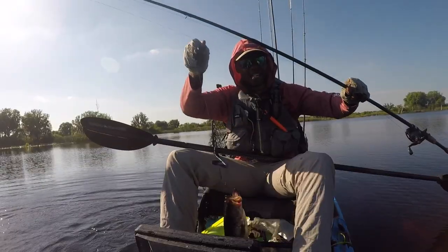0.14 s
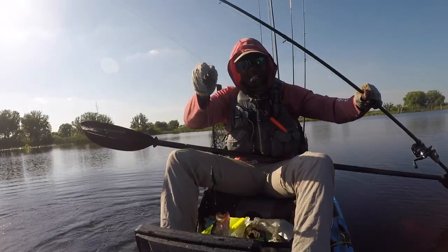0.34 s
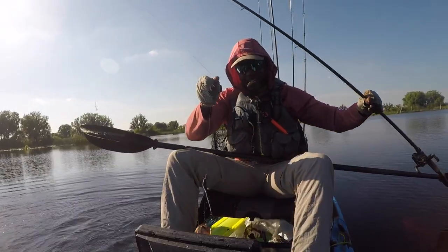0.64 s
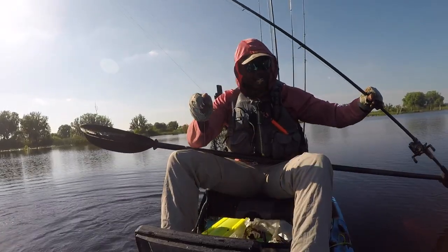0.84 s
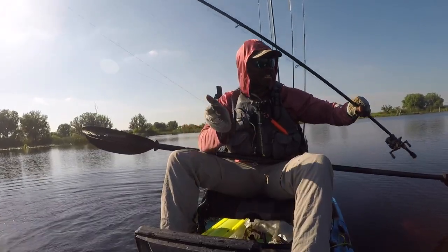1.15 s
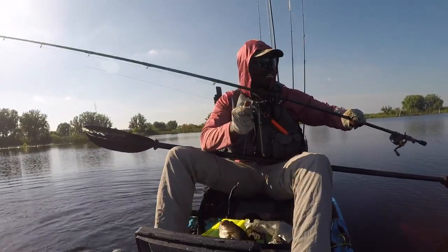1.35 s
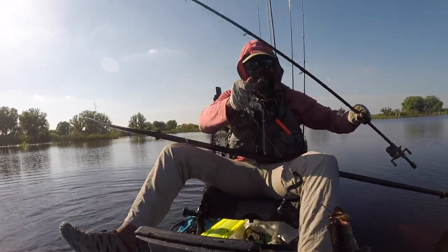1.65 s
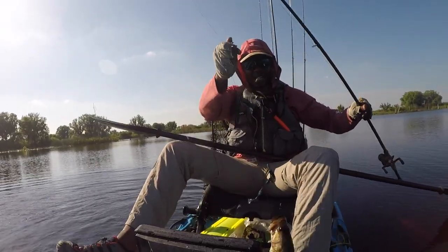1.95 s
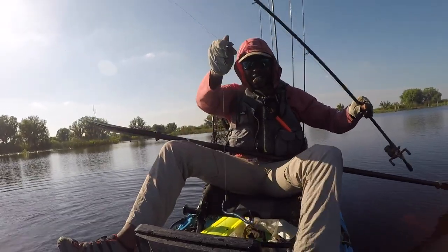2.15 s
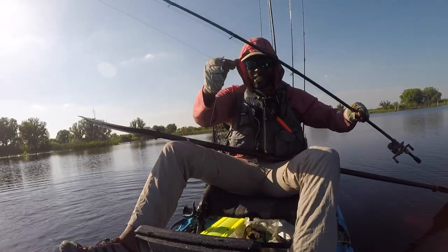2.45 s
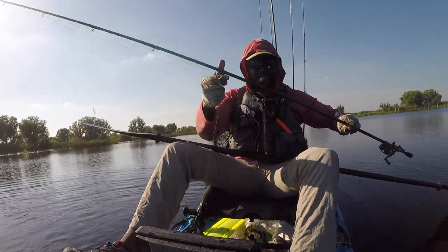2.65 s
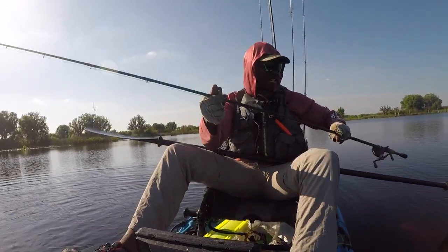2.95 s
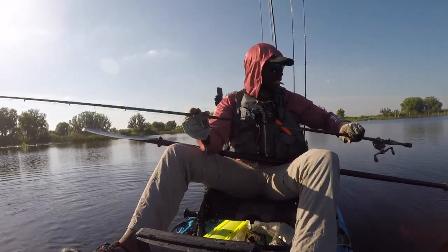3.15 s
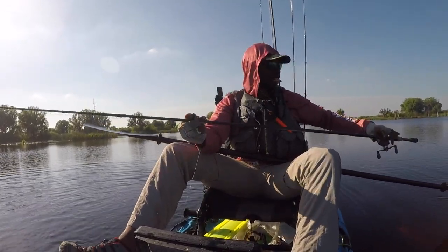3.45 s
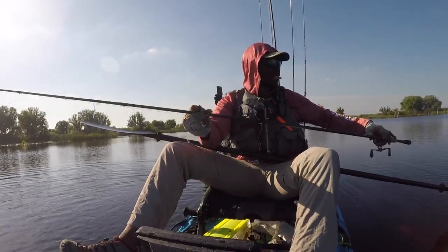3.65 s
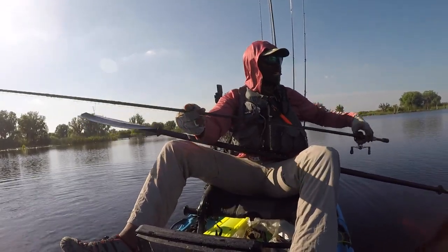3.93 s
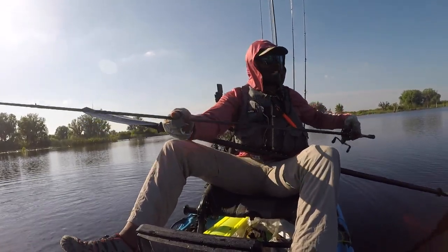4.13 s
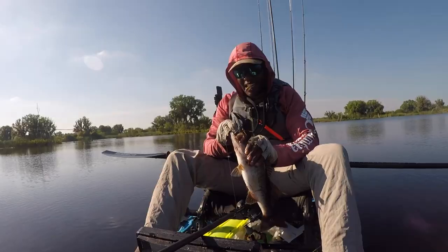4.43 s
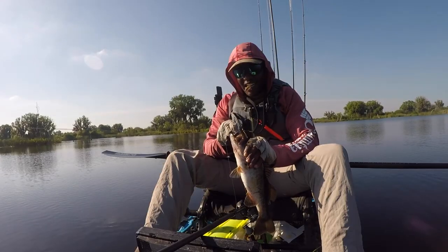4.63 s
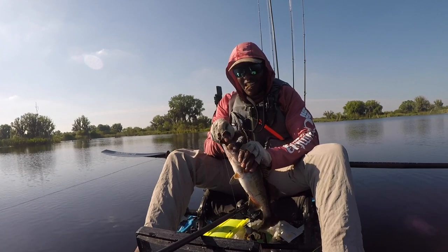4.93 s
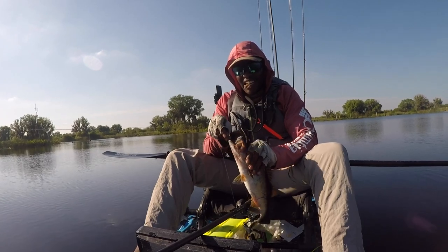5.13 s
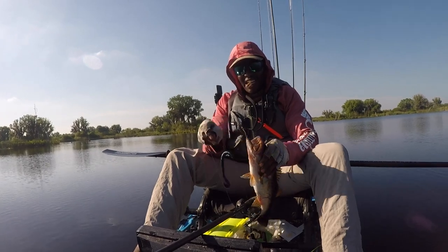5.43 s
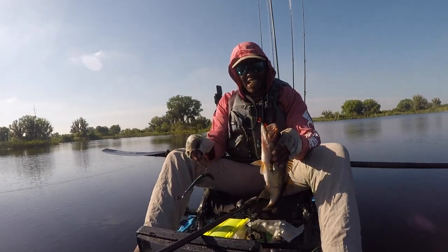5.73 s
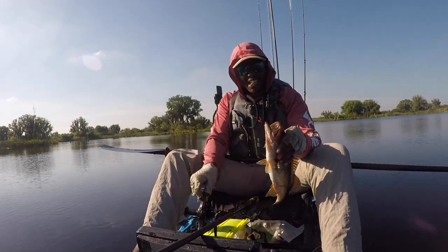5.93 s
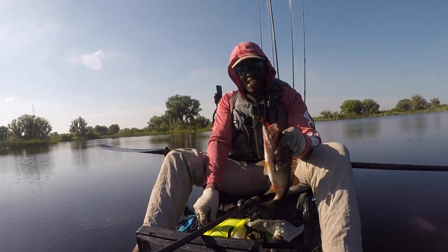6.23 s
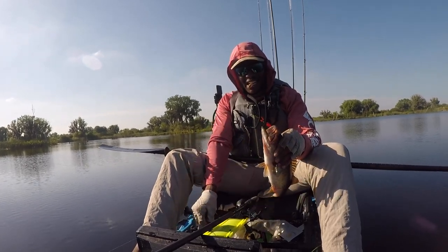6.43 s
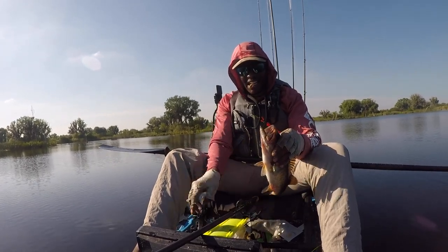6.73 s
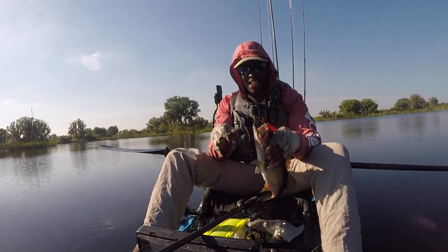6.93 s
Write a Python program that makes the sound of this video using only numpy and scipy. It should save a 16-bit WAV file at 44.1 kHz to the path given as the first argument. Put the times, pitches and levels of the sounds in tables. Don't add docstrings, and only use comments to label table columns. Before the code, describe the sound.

On a calm lake, a camera clamped to a plastic kayak picks up a few soft bumps, then a fish thrashing violently: deep hollow hull booms, cracking wet slaps, spray and rattling deck gear. A buzzing bird calls briefly behind it. The uproar cuts off abruptly, leaving soft airy hush, small tackle clicks, faint lapping and a light rustle.

```python
import sys
import numpy as np
from scipy import signal
from scipy.fft import rfft, irfft, next_fast_len
from scipy.io import wavfile
from scipy.ndimage import uniform_filter1d, map_coordinates

SR = 44100
rng = np.random.default_rng(int(sys.argv[2]) if len(sys.argv) > 2 else 0)


def gain_from_decibels(decibels):
    exponent = np.asarray(decibels, float) / 20
    return 10 ** exponent


def pcm_store(signal):
    levels = np.round(np.clip(np.atleast_2d(signal), -1, 1) * 32767)
    wavfile.write(sys.argv[1], SR, levels.astype(np.int16).T)


N = 312228
TIME_S = np.arange(N) / SR
STEP = 32
CUT_S = 4.393

# (frequency [Hz], width [Hz], level [dB])
MOUNT_MODES = [(35.6, 21, -4), (65.3, 37.7, -7.5)]
# (frequency [Hz], width [Hz], level [dB])
HULL_MODES = [(91, 30, -3.5), (126, 27, 0.5), (165, 37, -5), (201, 53, -5), (266, 37, -6.5)]
# (frequency [Hz], width [Hz], level [dB])
DECK_MODES = [(302.6, 52.3, 2), (380.2, 45, 1), (466, 81, -6.5), (593.5, 81, -7), (730, 118, -11.5),
              (885, 120, -20.5)]
# (time [s], peak [dB], body [dB])
FLANK_KNOCKS = [(1.0444, -30.5, -13), (1.175, -46.5, 7.5), (1.328, -32.5, 18.5), (1.358, -34, 1),
                (1.492, -34, -2), (1.604, -38.5, 7), (1.734, -34.5, -8), (1.836, -31.5, 10.5),
                (2.036, -50, 5), (2.101, -38.5, -21), (2.157, -46.5, 11), (2.1695, -24.5, -11.5),
                (2.24, -37, -8), (2.408, -42, 12), (2.541, -42, 10), (2.852, -40, 5), (3.099, -36, 2),
                (3.454, -25, 1), (3.479, -26.5, -7), (3.662, -23, 0.5), (2.906, -40, 7), (3.157, -40.5, -4),
                (3.198, -34.5, -5), (3.65, -32, -2), (3.844, -38, -6), (3.927, -30, 12), (3.998, -46, -1),
                (4.045, -40, -5), (4.168, -32, 7.5), (4.179, -42, 14), (4.326, -40, 14.5)]


def unit(x):
    return x / np.sqrt(np.mean(x ** 2) + 1e-20)


def along(points, hz):
    f, v = np.transpose(points)
    return np.interp(np.log(hz + 1), np.log(f + 1), v)


def curves(rows):
    s, *cols = np.transpose(rows)
    return [np.interp(TIME_S, s, c, left=-120, right=-120) for c in cols]


def wobble(rate):
    knots = rng.standard_normal(int(N * rate / SR) + 4)
    return map_coordinates(knots, [np.arange(N) * rate / SR])


def filtered(x, *responses):
    m = next_fast_len(N + SR // 4, True)
    hz, spectrum = np.fft.rfftfreq(m, 1 / SR), rfft(x, m)
    for response in responses:
        spectrum = spectrum * response(hz)
    return irfft(spectrum, m)[..., :N]


def modes(table):
    def response(f):
        total = 0
        for k, (hz, width, db) in enumerate(table):
            band = 1j * f * width
            total = total + (-1) ** k * gain_from_decibels(db) * band / (hz * hz - f * f + band)
        return total
    return response


def grit(rate, spread_db, hiss):
    size = np.minimum(rng.exponential(size=N), 3)
    taps = (rng.random(N) < rate / SR) * rng.standard_normal(N) * gain_from_decibels(spread_db * size)
    return unit(taps) + hiss * rng.standard_normal(N)


def even(x, span_s):
    return x / np.sqrt(np.abs(uniform_filter1d(x * x, int(span_s * SR))) + 1e-12)


def swells(s, db, rise_s, t60):
    late = np.arange(0, N, STEP) / SR - np.asarray(s)[:, None]
    span = np.where(late < 0, np.abs(rise_s)[..., None], np.abs(t60)[..., None]) + 1e-3
    return gain_from_decibels(np.asarray(db)[:, None] - 60 * np.abs(late) / span) ** 2


def smooth(control):
    return np.interp(np.arange(N), np.arange(0, N, STEP), control)


def loudness(energy, idle_db):
    return smooth(np.sqrt(energy.sum(axis=0) + gain_from_decibels(idle_db) ** 2))


def before_cut():
    return np.clip((CUT_S - TIME_S) / .006, 0, 1)


def shake(shell, hiss):
    boom = filtered(grit(70, spread_db=2, hiss=hiss), modes(shell), modes([(165, 177, 0)]))
    rattle = filtered(grit(300, spread_db=5, hiss=hiss), modes(DECK_MODES), modes([(396, 700, 0)]))
    return even(boom, 0.053), even(rattle, 0.03)


def hull():
    # (time [s], boom [dB], panel pitch [Hz], t60 [s])
    strikes = [
        (1.494, -28, 165, 0.38),
        (2.409, -31.5, 213.8, 0.42),
        (2.549, -14.5, 165, 0.495),
        (2.852, -26.5, 189.4, 1.7),
        (2.933, -20.5, 176.5, 0.72),
        (3.365, -20, 152.5, 0.63),
        (4.075, -18, 203.6, 0.46),
    ]
    # (time [s], boom [dB], panel pitch [Hz], t60 [s])
    heaves = [(.036, -34.5, 223, 0.57), (0.174, -36, 196.7, 0.25), (0.357, -37.5, 201.5, 0.49),
              (0.751, -39, 218.6, 0.29), (1.2, -32.5, 215.1, 0.52), (1.295, -16.5, 229.8, 0.63),
              (1.385, -21.5, 197.8, 0.27), (1.53, -20.5, 163.3, 1.04), (1.629, -24, 180, 0.97),
              (1.71, -24.5, 180, 0.51), (1.778, -22, 220.1, 0.87), (1.827, -18.5, 185, 0.33),
              (1.92, -27, 171.6, 1), (1.988, -20, 148.4, 0.54), (2.04, -16, 217.2, 0.29),
              (2.178, -24.5, 128.2, 0.66), (2.6, -16, 135.2, .3), (2.642, -13, 128, .07),
              (2.68, -31, 132, 1.46), (3.018, -19, 185.5, 0.5), (3.116, -18.5, 130.6, 0.59),
              (3.41, -14, 186, 0.84), (3.482, -18.5, 156, 1.1), (3.58, -20.5, 134.7, 0.46),
              (3.672, -20, 113.7, 0.54), (3.902, -36, 190.6, 1.43), (4.178, -31, 140, 0.4),
              (4.355, -29, 126, 0.49)]
    # (time [s], level [dB], rise [s], t60 [s])
    rattles = [(0.035, -44, 0.21, 0.29), (.175, -53, 0.19, .1), (.358, -40.5, .15, 0.15),
               (.751, -43.5, .15, 0.1), (1.125, -40, 0.078, .5), (1.18, -32.5, .03, 0.63),
               (1.288, -15.5, 0.1, 0.19), (1.335, -20.5, 0.092, 0.23), (1.361, -27.5, 0.037, 0.1),
               (1.495, -21.5, 0.028, 0.11), (1.532, -26, 0.045, 0.32), (1.607, -34.5, .04, 0.22),
               (1.63, -25, 0.056, 0.23), (1.708, -28, 0.076, 0.27), (1.781, -29, 0.058, 0.32),
               (1.81, -24, 0.07, 0.21), (1.842, -29.5, 0.064, 0.077), (1.95, -31, 0.79, .5),
               (1.995, -26.5, .2, 0.24), (2.04, -25.5, 0.046, .12), (2.07, -40, .1, 0.36),
               (2.174, -39, 0.14, 0.43), (2.411, -33.5, 0.013, 0.1), (2.546, -26, 0.011, 0.21),
               (2.866, -34, 0.071, .4), (2.942, -21, 0.016, 0.25), (3.02, -28.5, 0.05, 0.14),
               (3.111, -25, .04, .3), (3.2, -38.5, 0.043, 0.19), (3.376, -17.5, 0.056, 0.079),
               (3.42, -19.5, .12, 0.24), (3.478, -19, 0.087, 0.2), (3.545, -22, .04, 0.11),
               (3.672, -26.5, .08, 0.16), (3.85, -45.5, .03, 0.56), (3.93, -33, 0.055, 0.24),
               (4.078, -23, 0.046, .15), (4.177, -35, .03, 0.2), (4.33, -34.5, .02, .2),
               (4.35, -28.5, 0.074, 0.13)]
    # (time [s], level [dB], t60 [s])
    jolts = [(1.35, -49.5, 2.7), (1.6, -26, 0.2), (1.81, -26.5, 0.41), (2.09, -28, 0.22),
             (2.211, -30.5, 0.41), (2.4, -45.5, 2.4), (2.58, -36, 1.5), (2.95, -30, 2.5),
             (3.15, -22.5, 1.27), (3.51, -24, 0.48), (3.68, -21, 0.57), (3.95, -40, 2.3), (4.11, -30, 2.5),
             (4.35, -29, 0.8)]
    strike_rise_s, heave_rise_s, jolt_rise_s = .012, .3, 0.44
    slack, slacken_s = 0.66, .12
    idle_boom_db, idle_rattle_db, idle_sway_db = -45.5, -62.5, -63
    full_hum_s = 1.4
    panel_s = 1.26

    s, boom_db, hz, t60 = np.transpose(strikes + heaves)
    rise_s = np.repeat([strike_rise_s, heave_rise_s], [len(strikes), len(heaves)])
    energy = swells(s, boom_db, rise_s, t60)
    since_s = np.maximum(np.arange(0, N, STEP) / SR - s[:, None], 0)
    pitch = hz[:, None] * (slack + (1 - slack) * np.exp(-since_s / slacken_s))
    panel_hz = smooth((energy * pitch).sum(axis=0) / (energy.sum(axis=0) + 1e-30))

    boom_gain = loudness(energy, idle_boom_db)
    rattle_gain = loudness(swells(*np.transpose(rattles)), idle_rattle_db)
    s, db, t60 = np.transpose(jolts)
    sway_gain = loudness(swells(s, db, jolt_rise_s, t60), idle_sway_db)

    jolting = grit(40, spread_db=9.5, hiss=0.36)
    sway = even(filtered(jolting, modes(MOUNT_MODES), modes([(45.6, 155, 0)])), 0.06)
    phase = 2 * np.pi * np.cumsum(panel_hz) / SR + 1.48 * wobble(35)
    panel = unit(np.sin(phase) * gain_from_decibels(2.3 * wobble(35)))
    boom, rattle = shake(HULL_MODES, hiss=1.58)
    share = np.where(TIME_S < panel_s, .3, .7)
    hum = np.sqrt(share) * panel + np.sqrt(1 - share) * boom
    thin_hum = filtered(hum, lambda hz: 1 / (1 + (132 / (hz + 1)) ** 8))
    hum = np.where(TIME_S < full_hum_s, thin_hum, hum)
    return before_cut() * (gain_from_decibels(2.0) * sway_gain * sway + gain_from_decibels(-2.5) * boom_gain * hum + rattle_gain * rattle)


def blows():
    # (time [s], peak [dB], panel pitch [Hz])
    hull_hits = [(1.114, -23, 201), (1.284, -7, 272), (1.317, -0.5, 180), (1.525, -1.5, 171.6),
                 (1.622, 0, 186), (1.779, -11.5, 245), (1.803, -8, 250), (1.836, 1, 182),
                 (1.983, -7.5, 115.4), (2.033, 0, 206), (2.166, -10.5, 110), (2.245, -16.5, 133),
                 (2.405, -20, 294), (2.543, -1, 160), (2.565, -10, 140), (2.864, -15.5, 203),
                 (2.934, -5, 198.9), (3.017, -7, 229), (3.024, -5, 240), (3.101, -3, 108),
                 (3.197, -14, 139), (3.367, -3, 184), (3.404, 0, 133), (3.473, -3.5, 213),
                 (3.534, -4.5, 102), (3.663, -6, 99.3), (4.073, -5.5, 250), (4.088, -8.5, 226),
                 (4.168, -17.5, 131), (4.35, -20, 239),
                 (3.93, -20, 275), (1.72, -12, 270), (3.44, -5, 270), (.028, -21, 266), (.155, -28.5, 321),
                  (0.34, -22.5, 156), (0.737, -25, 198), (5.479, -40.5, 248), (5.994, -32, 187),
                  (6.314, -38.5, 357), (6.841, -38, 174)]
    delay_s = 0.00478
    out, push, t = np.zeros(N + SR), np.zeros(N), np.arange(SR // 4) / SR
    sag = 1 + 0.32 * np.exp(-t / 0.0054)
    attack = 1 - np.exp(-t / 0.00074)
    for s, db, hz in hull_hits:
        t60_s = np.clip(0.043 + 0.02 * db, .03, .15)
        start = round((s + delay_s) * SR)
        ring = np.sin(2 * np.pi * hz * np.cumsum(sag) / SR) * gain_from_decibels(-60 * t / t60_s)
        ring *= (s > CUT_S) | (s + t < CUT_S)
        out[start:][:len(t)] += gain_from_decibels(db - 3.0) * ring * attack
        push[start] = gain_from_decibels(db)
    shell = gain_from_decibels(29.0) * filtered(push, modes(HULL_MODES), modes([(180, 2400, 0)]))
    deck = gain_from_decibels(26.5) * filtered(push, modes(DECK_MODES), modes([(540, 265, 0.0092)]))
    return out[:N] + shell + deck


def contacts():
    # (time [s], peak [dB], ring [Hz], body [dB])
    tail_slaps = [(1.2167, -28, 5660, -24), (1.2298, -22.5, 6000, -29), (1.259, -17, 5100, -36),
                  (1.268, -12, 6100, -1), (1.276, -8, 5400, -5), (1.293, -15, 5505, -8),
                  (1.465, -37, 6500, -15), (1.627, -15, 2380, -17), (1.698, -26.5, 5750, -14),
                  (1.764, -32, 5570, -14), (1.9772, -31, 3080, -7), (2.9342, -23, 4900, 4),
                  (3.011, -18, 5800, -4), (3.116, -12.5, 5750, 0), (3.343, -31, 5530, -16),
                  (3.363, -10.5, 6630, 2), (3.4241, -18.5, 6070, -21), (3.5356, -27.5, 2760, 7),
                  (4.0749, -17, 2540, 5), (4.3399, -21, 2930, -7), (3.9407, -21.5, 3240, -4),
                  (4.3477, -15, 3570, 6), (4.373, -20, 3270, -11)]
    # (time [s], peak [dB], ring [Hz], t60 [s], ring level [dB])
    tackle_clicks = [
        (4.848, -28.5, 1230, 0.023, 17),
        (4.849, -15.5, 3400, 0.005, 0),
        (4.894, -41, 1230, 0.066, 4),
        (5.002, -47, 896, 0.13, -5),
        (5.481, -46.5, 1040, 0.076, -31),
        (5.545, -22.5, 4400, 0.02, -9),
        (5.856, -28.5, 6180, 0.011, -8),
        (2.407, -49, 585, 0.035, 26.5),
    ]
    # (time [s], peak [dB])
    drops = [(1.381, -42), (1.7975, -32), (1.874, -36), (1.9437, -34.5), (1.99, -35), (1.999, -33),
             (2.0085, -29.5), (2.068, -32), (2.892, -37), (3.052, -37), (3.373, -22), (3.467, -24.5),
             (3.512, -40), (4.07, -27), (.209, -48)]
    knock_hz = 1500
    knocks = [(s, db, knock_hz, body_db, 0.033, -9.5) for s, db, body_db in FLANK_KNOCKS]
    wet = [(s, db, hz, body_db, 0.027, -10) for s, db, hz, body_db in tail_slaps]
    tackle = []
    for s, db, hz, t60_s, ring_db in tackle_clicks:
        body_db = 3 - 6.5 * np.log2(hz / 1000)
        tackle.append((s, db, hz, body_db, t60_s, ring_db))
    ticks = [(s, db, knock_hz, -12, .014, -30) for s, db in drops]
    return knocks + wet + tackle + ticks


def slaps():
    # (frequency [Hz], density [dB per Hz])
    crack_spectrum = [(760, -42.5), (1300, 0.5), (2540, -1), (5740, -3), (6490, 0), (8940, -12.5),
                      (13400, -38), (15300, -65)]
    # (frequency [Hz], density [dB per Hz])
    scuff_spectrum = [(500, -43), (1000, -8), (2000, -6.5), (3500, -5.5), (6200, -4.5), (8000, -10.5),
                      (12000, -30), (15300, -65.5)]
    bright, dull, body, ring = np.zeros((4, N + SR))
    t = np.arange(SR // 8) / SR
    drift = .8 * wobble(250)
    for k, (s, db, hz, body_db, t60_s, ring_db) in enumerate(contacts()):
        start = round(s * SR)
        here = slice(start, start + len(t))
        fade = gain_from_decibels(db - 60 * t / np.clip(t60_s, .006, .3)) * (1 - np.exp(-t / 0.0024))
        burst = dull if k < len(FLANK_KNOCKS) else bright
        burst[here] += fade
        body[here] += gain_from_decibels(body_db) * fade
        ring[here] += gain_from_decibels(ring_db) * fade * np.sin(2 * np.pi * hz * t + drift[here] * hz / 1500)
    crack = grit(3300, spread_db=7.5, hiss=0.94)
    crack = unit(filtered(crack, lambda hz: gain_from_decibels(along(crack_spectrum, hz))))
    scuff = grit(3000, spread_db=7.5, hiss=0.7)
    scuff = unit(filtered(scuff, lambda hz: gain_from_decibels(along(scuff_spectrum, hz))))
    thud = unit(filtered(rng.standard_normal(N), modes([(630, 380, 1.5), (1230, 980, -7.0)])))
    bursts = gain_from_decibels(-4.5) * bright[:N] * crack + gain_from_decibels(-6.5) * dull[:N] * scuff
    return bursts + gain_from_decibels(-2.0) * body[:N] * thud + ring[:N]


def spray():
    # (time [s], fizz [dB], slosh [dB], rise [s], t60 [s])
    bursts = [(1.06, -62, -50, .1, .1), (1.19, -48, -54.5, 1.05, 0.63), (1.277, -20, -24.5, 0.1, 0.063),
              (1.3, -48, -36, .1, .25), (1.335, -57, -36, 0.24, 0.1), (1.47, -45, -49.5, 0.52, .7),
              (1.54, -42.5, -47, 0.68, .05), (1.631, -36, -31, 0.012, 0.013), (1.705, -46, -53, .1, .35),
              (1.765, -43, -41.5, 0.23, .15), (1.805, -36, -47.5, 0.075, .25),
              (1.843, -39, -47.5, 0.3, .04), (1.885, -49, -45, .05, .8), (1.99, -36.5, -38, 0.6, 0.15),
              (2.015, -39, -50.5, 0.22, .1), (2.035, -46.5, -51.5, .3, .03), (2.25, -54, -59, .05, .3),
              (2.178, -45.5, -38, 0.066, 0.071), (2.9, -47, -48, 0.29, .1), (3.019, -42, -41.5, 0.5, 0.32),
              (3.118, -23.5, -24.5, 0.057, 0.024), (3.33, -49, -54.5, 1.3, 0.33),
              (3.365, -22, -26, 0.024, 0.04), (3.39, -48, -50.5, 0.03, 1), (3.422, -37.5, -42, 0.18, .08),
              (3.46, -42, -43, 0.092, 0.11), (3.69, -47, -49, 0.33, 0.25), (3.9, -53, -52, 0.55, 0.37),
              (3.97, -52, -41, 0.31, 0.025), (4.09, -45.5, -39.5, 0.034, .3), (4.19, -63, -50, .1, 0.091),
              (4.352, -35, -31, 0.067, 0.06), (4.378, -38.5, -31.5, .1, .1)]
    # (time [s], level [dB], rise [s], t60 [s])
    rustles = [
        (5.8, -65, 0.27, .3),
        (6.11, -63, 1, 0.89),
    ]
    # (frequency [Hz], density [dB per Hz])
    fizz_spectrum = [(2060, -34), (3500, 0), (4320, 1), (6100, 9.5), (9050, -2.5), (13100, -21),
                     (13800, -30), (15300, -56)]
    # (frequency [Hz], density [dB per Hz])
    slosh_spectrum = [(450, -42.5), (1100, 3), (2000, -7), (3200, -9), (4200, -11), (5500, -63)]
    clumps = gain_from_decibels(3.2 * wobble(70))
    fizz = grit(2900, spread_db=4.0, hiss=0.85)
    fizz = unit(clumps * filtered(fizz, lambda hz: gain_from_decibels(along(fizz_spectrum, hz))))
    slosh = grit(1600, spread_db=4.0, hiss=0.98)
    slosh = unit(clumps * filtered(slosh, lambda hz: gain_from_decibels(along(slosh_spectrum, hz))))
    s, fizz_db, slosh_db, rise_s, t60 = np.transpose(bursts)
    fizz_gain = loudness(swells(s, fizz_db - 10.5, rise_s, t60), -120)
    slosh_gain = loudness(swells(s, slosh_db - 7.5, rise_s, 1.3 * t60), -120)
    rustle_gain = loudness(swells(*np.transpose(rustles)), -120)
    return before_cut() * (fizz_gain * fizz + slosh_gain * slosh) + rustle_gain * fizz


def pings():
    # (time [s], peak [dB], pitch [Hz], t60 [s])
    clear_rings = [(0.343, -48, 1043, .04), (1.046, -46, 1600, .07), (1.064, -52, 1850, 0.0501),
                   (1.068, -51, 2840, .05), (1.25, -41, 3300, 0.027), (1.272, -20, 2920, 0.015),
                   (1.331, -36.5, 3500, 0.021), (1.838, -33, 1513, 0.021), (2.037, -39.5, 1400, 0.028),
                   (2.158, -43, 1500, .05), (2.173, -38, 1750, 0.041), (2.409, -40, 947, 0.033),
                   (2.542, -40, 1584, .03), (2.598, -55, 1230, 0.31), (2.852, -41, 1215, .04),
                   (3.092, -37, 1410, 0.047), (3.108, -20.5, 694, 0.07), (3.197, -32, 608, 0.058),
                   (3.48, -38, 2680, 0.026), (3.668, -27, 796, 0.047), (4.167, -35.5, 1400, 0.031),
                   (4.186, -43, 1406, .03), (5.772, -56, 3650, .04), (5.785, -55, 4030, .06),
                   (5.79, -55, 810, 0.24), (6.298, -51, 1480, .04), (6.314, -47.5, 1650, .05),
                   (6.33, -49, 1790, .04), (6.338, -52, 1510, .1)]
    out, t = np.zeros(N + SR), np.arange(SR // 6) / SR
    for s, db, hz, t60_s in clear_rings:
        fade = gain_from_decibels(-60 * t / np.clip(t60_s, .01, .4)) * (1 - np.exp(-t / 0.0019))
        out[round(s * SR):][:len(t)] += gain_from_decibels(db) * fade / fade.max() * np.sin(2 * np.pi * hz * t)
    return out[:N]


def lapping():
    # (time [s], boom [dB], gurgle [dB], t60 [s])
    laps = [
        (4.84, -49.5, -64, 5.2),
        (5.5, -45, -68.5, 0.55),
        (6.01, -46.5, -50, 0.78),
        (6.323, -57, -41.5, 0.52),
        (6.828, -41, -45, 0.36),
    ]
    # (frequency [Hz], width [Hz], level [dB])
    afloat_modes = [(156, 37.4, 0), (198, 83, -1.5), (255.5, 98, -5)]
    rise_s = 0.12
    s, boom_db, gurgle_db, t60 = np.transpose(laps)
    boom, gurgle = shake(afloat_modes, hiss=2.4)
    boom = boom * loudness(swells(s, boom_db, rise_s, t60), idle_db=-55)
    gurgle = gurgle * loudness(swells(s, gurgle_db, rise_s, 0.42 * t60), idle_db=-75)
    sway = unit(filtered(rng.standard_normal(N), modes(MOUNT_MODES)))
    sway = gain_from_decibels(-50.0 + 2.8 * wobble(3.8)) * sway
    return (1 - before_cut()) * (boom + gurgle + sway)


def bird():
    # (time [s], pitch [Hz], level [dB])
    level_phrase = [
        (3.11, 5750, -77.5),
        (3.14, 5810, -54.5),
        (3.34, 5810, -49.5),
        (3.45, 5820, -60),
        (3.52, 5770, -66),
        (3.6, 5760, -59),
        (3.65, 5750, -56),
        (3.68, 5700, -80),
    ]
    # (time [s], pitch [Hz], level [dB])
    falling_phrase = [
        (3.68, 5500, -66),
        (3.715, 5100, -64),
        (3.735, 4870, -57.5),
        (3.8, 4590, -58.5),
        (3.85, 4400, -62),
        (3.92, 4350, -68),
    ]
    chop = np.cumsum(142 * (1 + 0.036 * wobble(56))) / SR % 1
    beat = np.exp(-chop / .3) * (1 - np.exp(-chop / .06)) * gain_from_decibels(1.5 * wobble(140))
    out = np.zeros(N)
    for phrase, sweep, under_db in [(level_phrase, .13, -11), (falling_phrase, .24, -15)]:
        hz, level_db = curves(phrase)
        hz = np.abs(hz)
        chirp_hz = hz * (1 + .02 * wobble(400) + sweep * (.2 - chop))
        whistle = np.sin(2 * np.pi * np.cumsum(chirp_hz) / SR)
        under = np.zeros(N)
        for ratio in (.78, .7, .62):
            breathy_hz = ratio * hz * (1 + .035 * wobble(900))
            under += np.sin(2 * np.pi * np.cumsum(breathy_hz) / SR)
        out += gain_from_decibels(level_db) * unit(beat * (whistle + gain_from_decibels(under_db) * under))
    return out


def lake():
    # (time [s], level [dB])
    air_level = [(0.0, -62.5), (1.34, -61.5), (1.89, -65), (2.05, -73), (2.17, -71.5), (2.88, -68),
                 (3.17, -68.5), (3.35, -63.5), (3.49, -81.5), (3.98, -63.5), (6.25, -61.5), (7.08, -62.5)]
    # (frequency [Hz], density [dB per Hz])
    hush_spectrum = [(120, -34.5), (220, 0.5), (330, -5.5), (1100, -13), (4600, -25), (6500, -21.5),
                     (11000, -27), (15300, -38.5)]
    (air_db,) = curves(air_level)
    patchy = rng.standard_normal(N) * gain_from_decibels(0.61 * wobble(5.5))
    hush = filtered(patchy, lambda hz: gain_from_decibels(along(hush_spectrum, hz)))
    treble = filtered(hush, lambda hz: (hz > 2000) & (hz < 12000))
    return gain_from_decibels(air_db) * hush / np.std(treble)


def ports(x, wide, shared, tilt):
    # (frequency [Hz], lead [rad])
    left_lead = [(0, 0), (520, -3.5), (1120, -3.5), (1640, -5.4), (5600, -6.6), (8530, -8.2), (9820, -6.1),
                 (15000, -6.8)]
    z = signal.stft(x, nperseg=1024)[2]
    z = z * np.exp(2j * np.pi * rng.random(z.shape))
    scattered = unit(signal.istft(z, nperseg=1024)[1][:N]) * np.std(x)

    def share(hz):
        return np.clip(along(shared, hz), 0, 1)

    def turn(hz):
        left = gain_from_decibels(along(tilt, hz)) * np.exp(1j * along(left_lead, hz))
        return np.exp(1j * np.angle((left - 1) / (left + 1)))

    side = filtered(x, lambda hz: gain_from_decibels(along(wide, hz)) * np.sqrt(share(hz)) * turn(hz))
    side += filtered(scattered, lambda hz: gain_from_decibels(along(wide, hz)) * np.sqrt(1 - share(hz)))
    return np.array([x + side, x - side])


def scene():
    # (frequency [Hz], ratio [dB])
    near_wide = [(60, -7.5), (110, -3.5), (380, 2), (690, 10), (1280, 1.5), (3000, -8.5), (8040, -1.5),
                 (14800, -4)]
    calm_wide = [(60, -10), (200, 0.5), (380, 3.5), (690, 9.5), (1280, 6.5), (4360, -4), (8040, .5)]
    # (frequency [Hz], share [0-1])
    near_shared = [(30, 0.19), (80, 0.46), (200, 0.87), (600, 0.93), (1300, 0.5), (3000, 1), (6000, 1),
                   (12000, .3)]
    calm_shared = [(60, 0.2), (200, 0.36), (640, 0.11), (3000, 0.31), (8000, 0.055)]
    # (frequency [Hz], ratio [dB])
    near_tilt = [(60, -7), (200, -8), (690, -2), (2360, -5), (4360, 0), (8040, -3.5), (14800, -11)]
    calm_tilt = [(110, -3), (200, -1.5), (690, -1), (4360, 0), (8040, -4), (14800, -0.5)]
    near = hull() + blows() + slaps() + spray() + pings()
    around = lapping() + bird() + lake()
    return ports(near, near_wide, near_shared, near_tilt) + ports(around, calm_wide, calm_shared, calm_tilt)


def low_pass(x):
    return signal.sosfilt(signal.butter(12, 15430, fs=SR, output="sos"), x)


def record(dry):
    top_hz, limit = 15140, 1.09
    calm = np.clip((TIME_S - CUT_S) / 0.006, 0, 1)
    wind_filtered = filtered(calm * dry, lambda hz: gain_from_decibels(-31) + 1 / (1 + (126 / (hz + 1)) ** 18))
    heard = (1 - calm) * dry + wind_filtered
    limited = heard / (1 + np.abs(heard / limit) ** 6) ** (1 / 6)
    mix = filtered(limited, lambda hz: hz < top_hz)
    return low_pass(mix)


dry = scene()
out = record(dry)
pcm_store(out)
```